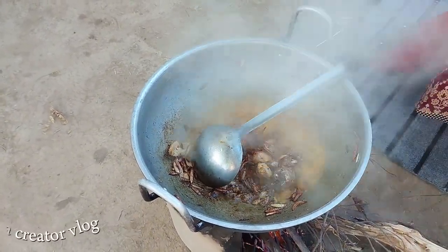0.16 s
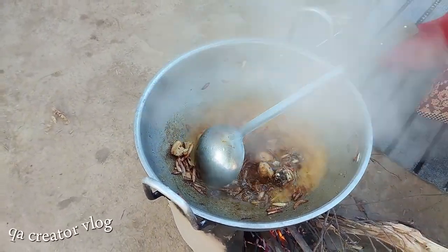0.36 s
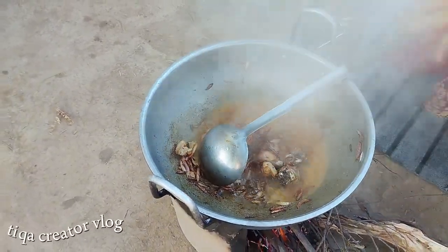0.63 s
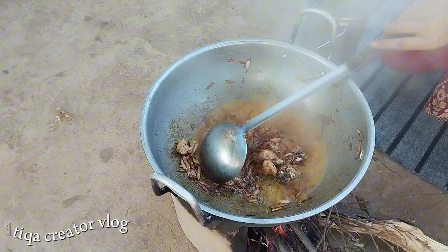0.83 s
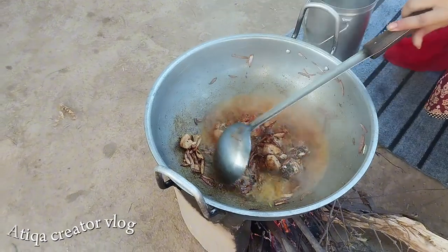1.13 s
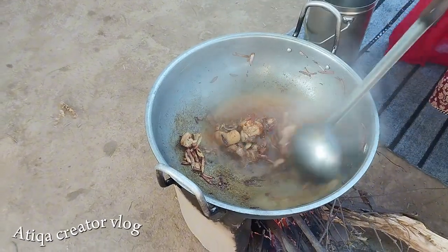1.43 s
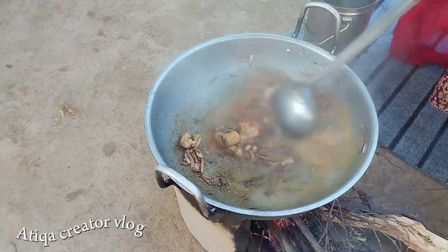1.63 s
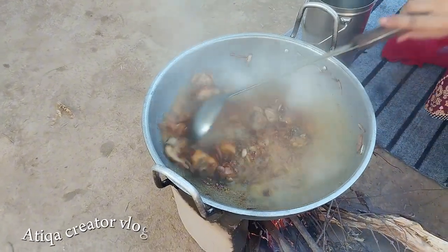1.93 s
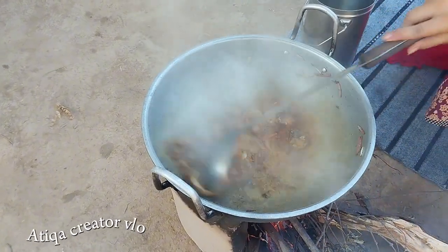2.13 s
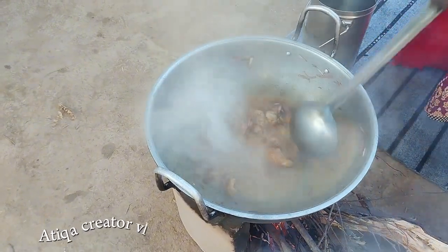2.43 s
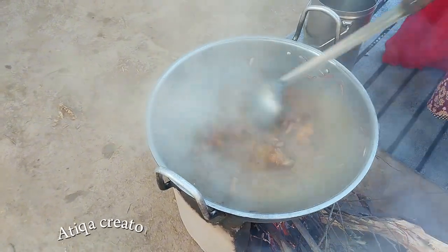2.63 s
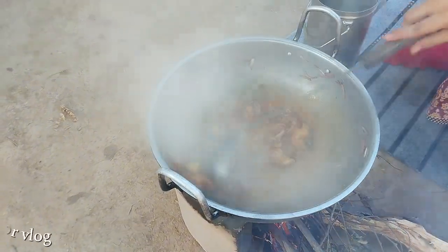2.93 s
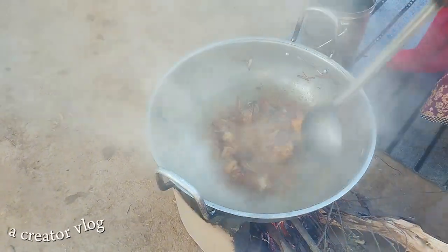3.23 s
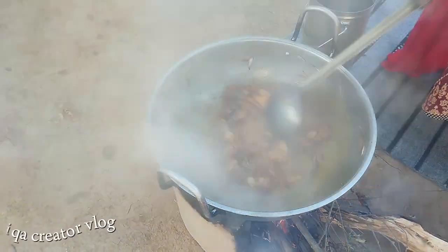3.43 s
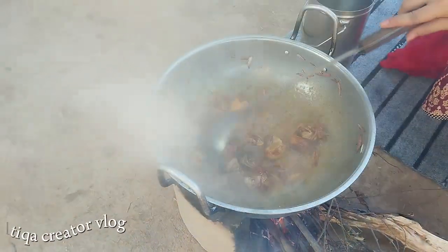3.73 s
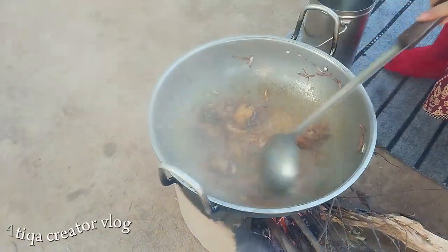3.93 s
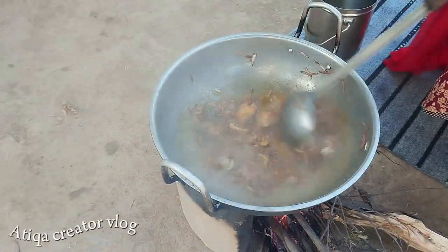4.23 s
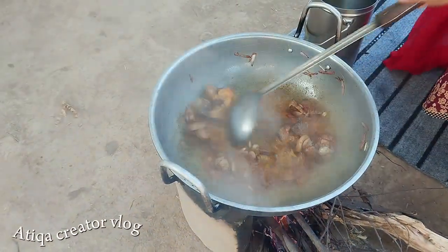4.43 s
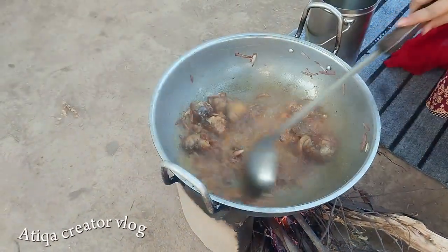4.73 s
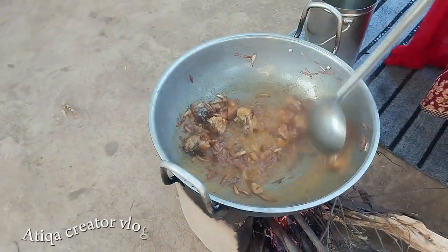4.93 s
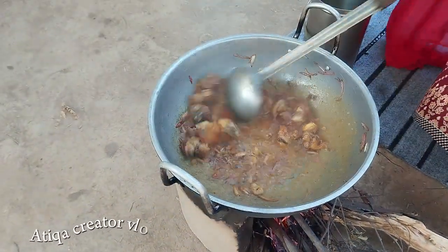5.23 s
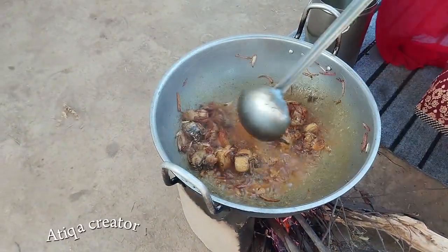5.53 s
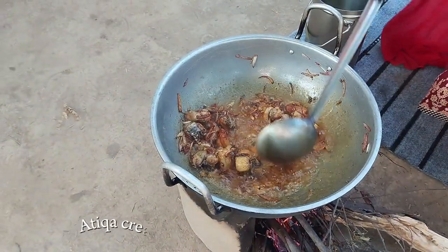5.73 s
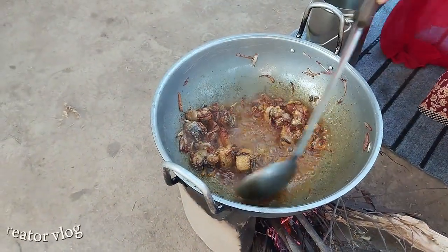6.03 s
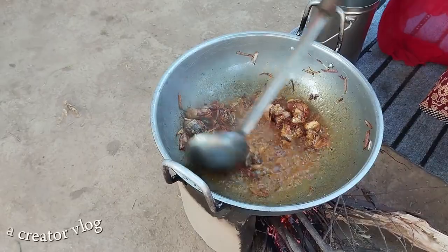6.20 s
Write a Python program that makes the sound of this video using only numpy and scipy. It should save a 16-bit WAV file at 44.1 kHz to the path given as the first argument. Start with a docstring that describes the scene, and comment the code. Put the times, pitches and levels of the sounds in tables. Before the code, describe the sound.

Loud, surging sizzling from a wide pan outdoors gradually thins, with ladle scrapes, dull knocks and wind rumble near the end.

```python
"""Sizzling pan over an outdoor fire

Water boils off in hot ghee in a wide metal pan over a wood fire, close to a phone.
Bursting bubbles hiss and spit, surge as a ladle turns the food, then thin as the water is used up.
The ladle scrapes, knocks and chatters, ringing the pan; late on, a breeze buffets the microphone."""
import sys
import numpy as np
from scipy import signal
from scipy.fft import rfft, irfft
from scipy.io import wavfile
from scipy.ndimage import uniform_filter1d

SR = 44100
rng = np.random.default_rng(int(sys.argv[2]) if len(sys.argv) > 2 else 0)


def to_wav(sig):
    """Store sig (one row per channel, or 1-D mono) as 16-bit WAV at the path in sys.argv[1].

    Samples outside -1..1 are clipped; the rate is SR.
    """
    pcm = np.clip(np.atleast_2d(sig), -1, 1) * 32767
    pcm = np.round(pcm).astype(np.int16)
    wavfile.write(sys.argv[1], SR, pcm.T)  # frames by channels


N = 280558
TIME = np.arange(N) / SR
HZ = np.fft.rfftfreq(N, 1 / SR)

# tone of the middle-sized bubbles and the spits: pitch_hz, level_db
HISS_TONE = [(900, -30.5), (2000, -10), (2600, -4), (3200, -1.5), (4200, -0.5), (5200, 0), (6800, 0),
             (8200, -4), (9500, -20), (12000, -14), (16000, -18)]


def amp(db):
    """Turns decibels into a gain to multiply by."""
    return 10 ** (np.asarray(db) / 20)


def evened(x):
    """Scales a signal to an average (rms) level of 1."""
    return x / np.sqrt(np.mean(x ** 2) + 1e-20)


def colour(x, tone):
    """Shapes a sound's lows and highs by rows of pitch_hz, level_db."""
    hz, db = np.transpose(tone)
    gain = amp(np.interp(np.log(HZ + 1), np.log(hz), db))
    return irfft(rfft(x) * gain, N)


def follow(rows):
    """A gain that glides through rows of time_s, level_db."""
    times, db = np.transpose(rows)
    return amp(np.interp(TIME, times, db))


def add(mix, start_s, sound):
    """Mixes a sound in at its start time."""
    part = mix[max(round(start_s * SR), 0):][:len(sound)]
    part += sound[:len(part)]


def wander(rate_hz):
    """A smooth random wobble, mostly slower than rate_hz."""
    return evened(irfft(rfft(rng.standard_normal(N)) / (1 + (HZ / rate_hz) ** 4), N))


def clicks(per_s, spread_db):
    """Random clicks of uneven size."""
    size = amp(spread_db * np.minimum(rng.exponential(1, N), 5))
    return evened(size * rng.choice([-1, 1], N) * (rng.random(N) < per_s / SR))


def clusters(x, depth_db=1.12):
    """Groups of like-sized bubbles come and go, each briefly lifting a narrow band of pitch."""
    bands = signal.stft(x, nperseg=1024, noverlap=768)[2]
    lift = uniform_filter1d(rng.standard_normal(bands.shape), size=16, axis=1)  # smooth in time
    lift = evened(uniform_filter1d(lift, size=5, axis=0))  # and in pitch
    return evened(signal.istft(bands * amp(depth_db * lift), nperseg=1024, noverlap=768)[1][:N])


def bubbles(per_s, spread_db, crackle, flutter_db, flutter_hz):
    """Bubbles burst in clumps over a wash of steam."""
    bursts = rng.standard_normal(N) + crackle * clicks(per_s, spread_db)
    return clusters(bursts) * amp(flutter_db * wander(flutter_hz))


def surges():
    """Water runs onto hot metal: boiling rises, holds while water arrives, then dies away."""
    # each surge: start_s, length_s, hiss_db, large_bubbles_db, rise_s, fall_s
    boil_offs = [(-.05, .62, -34.5, -41.5, 0.027, 0.092), (0.647, 0.19, -30.5, -37.5, 0.044, .008),
                 (0.93, 0.24, -28.5, -39, 0.053, 0.063), (1.157, 0.22, -31.5, -40, 0.022, 0.075),
                 (1.459, 0.081, -32, -36.5, 0.0061, 0.14), (1.604, 0.2, -30, -37.3, 0.049, 0.074),
                 (1.865, 0.13, -27, -37, 0.052, 0.06), (2.01, 0.2, -34.5, -63, 0.012, 0.12),
                 (2.436, 0.16, -30.5, -45, 0.021, 0.075), (2.595, 0.19, -31.5, -40.5, 0.035, 0.11),
                 (2.816, 0.267, -33.5, -51, 0.062, 0.021), (3.238, 0.19, -39, -61, .04, 0.018),
                 (3.533, 0.42, -34, -44.5, 0.065, 0.23), (4.373, 0.067, -38.5, -44.5, .05, 0.42),
                 (5.683, 0.074, -41, -64, 0.037, .02), (6.303, 0.094, -39, -52, .03, 0.034)]
    hiss_power, boil_power = np.zeros((2, N))
    for start_s, length_s, hiss_db, boil_db, rise_s, fall_s in boil_offs:
        age = np.maximum(TIME - start_s, 0)
        swell = (1 - np.exp(-age / rise_s)) * np.exp(-np.maximum(age - length_s, 0) / fall_s)
        hiss_power += (amp(hiss_db) * swell) ** 2
        boil_power += (amp(boil_db) * swell) ** 2
    return hiss_power, boil_power


def pan_air(x):
    """The air in the open pan boosts a few pitches."""
    # where that air rings: pitch_hz, width_hz, lift_db
    peaks = [(570, 330, 4.5), (1016, 164, 6.5), (1370, 340, 3), (1850, 146, 6), (2313, 110, 2.5),
             (2600, 95, 2.8), (3090, 116, 5), (3620, 360, 3), (4270, 190, 3)]
    lift_db = sum(db / (1 + (2 * (HZ - hz) / width) ** 2) for hz, width, db in peaks)
    return evened(irfft(rfft(x) * amp(lift_db), N))


def sizzle(boil_db=-41, boil_fall_db_per_s=1.15, fizz_follow=0.35):
    """Large bubbles boil, middling ones hiss, tiny ones fizz; all swell as water meets hot metal."""
    # tones of the large and the tiny bubbles: pitch_hz, level_db
    boil_tone = [(60, -9), (210, -13.5), (340, -11.5), (480, 0.5), (800, -3.5), (1300, 0.5), (2100, 0),
                 (3000, 3.5), (5000, -6), (9000, -30)]
    fizz_tone = [(3000, -18), (6000, -2), (8500, 2), (11000, -1.5), (12500, -4), (14500, 1), (15700, 2.5)]
    # steady hiss of the wet food, thinning as it dries: time_s, level_db
    simmer_levels = [(0, -34), (3.4, -34), (4.5, -33), (5.3, -36), (5.9, -40), (6.36, -41)]
    # finest spray, lasting until the pan is nearly dry: time_s, level_db
    spray_levels = [(0, -30), (1.35, -33), (2, -30.5), (3.3, -30), (5.5, -30), (6.36, -37.5)]
    boil = bubbles(per_s=900, spread_db=-0.5, crackle=0.56, flutter_db=0.8, flutter_hz=40)
    hiss = bubbles(per_s=2500, spread_db=2.0, crackle=0.63, flutter_db=0.26, flutter_hz=33)
    fizz = bubbles(per_s=3000, spread_db=3.5, crackle=0.44, flutter_db=0.88, flutter_hz=24)
    hiss_surge, boil_surge = surges()
    simmer = follow(simmer_levels)
    boil_gain = np.sqrt(amp(boil_db - boil_fall_db_per_s * TIME) ** 2 + boil_surge)
    hiss_gain = np.sqrt(simmer ** 2 + hiss_surge)
    fizz_gain = follow(spray_levels) * (hiss_gain / simmer) ** fizz_follow  # surges less than the hiss
    return (pan_air(colour(boil, boil_tone)) * boil_gain
            + pan_air(colour(hiss, HISS_TONE)) * hiss_gain
            + pan_air(colour(fizz, fizz_tone)) * fizz_gain)


def spits(fade_s=0.0035):
    """Pockets of water flash to steam in short, sudden puffs."""
    # each puff: start_s, level_db
    puffs = [(.823, -29), (.841, -34), (.945, -28.5), (1.143, -25), (1.473, -32), (2.548, -29),
             (3.552, -32), (3.622, -29.5), (4.853, -33), (5.371, -33)]
    swell = np.zeros(N)
    age = TIME[:SR // 10] / fade_s
    for start_s, db in puffs:
        add(swell, start_s, amp(db) * age * np.exp(1 - age))
    return swell * pan_air(colour(rng.standard_normal(N), HISS_TONE))


def pan_ring(force):
    """The metal rings briefly when touched, muffled by the food."""
    # notes of the full pan: pitch_hz, level_db, ring_s (time to fade by 60 dB)
    notes = [(298, -8, 0.28), (351, -2.5, 0.041), (434, 3.5, 0.028), (503, -4, 0.073), (544, -4, 0.051),
             (679, -7, 0.08), (698, -14, 0.11), (820, -20, 0.035), (1005, -16.5, 0.21), (1037, -18, 0.066),
             (1480, -12, 0.11)]
    t = TIME[:SR // 3]
    ring = sum(amp(db - 60 * t / ring_s) * np.sin(2 * np.pi * hz * t) for hz, db, ring_s in notes)
    return signal.oaconvolve(force, ring / np.abs(rfft(ring)).max())[:N]


def scrapes(fade_share=0.25):
    """The dragged ladle catches on grit and spice; each catch rings the pan."""
    # pushes, dull on food and brighter on bare metal: start_s, length_s, level_db, top_hz
    pushes = [(1.283, .22, -48, 600), (1.682, 0.327, -51, 648), (3.838, 0.065, -47, 700),
              (4.285, 0.4, -41.5, 700), (4.897, 0.091, -39, 1300), (5.054, .15, -47.5, 1300),
              (5.17, 0.305, -37.5, 1500), (5.223, 0.03, -30, 900), (5.27, 0.042, -32, 1500)]
    catches = clicks(per_s=970, spread_db=2.0)
    force = np.zeros(N)
    for start_s, length_s, db, top_hz in pushes:
        pressure = np.zeros(N)
        add(pressure, start_s, amp(db) * signal.windows.tukey(int(length_s * SR), fade_share))
        force += pressure * signal.sosfilt(signal.butter(2, top_hz, fs=SR, output="sos"), catches)
    return pan_ring(force) / pan_ring(catches).std()


def knocks(tick_hz=1350, tick_s=0.0018):
    """Each blow of the ladle makes a dull thud and a metal tick, and rings the pan."""
    # each thud: start_s, level_db, pitch_hz, ring_s, tick_db (compared with the thud)
    hits = [(3.883, -28.5, 332, 0.035, -25), (4.341, -20.5, 490, 0.031, -30), (4.345, -27.5, 290, 0.1, -30),
            (4.497, -31.5, 285, 0.077, -25), (4.602, -33, 494, 0.013, -17), (4.801, -24.5, 450, 0.0075, -8),
            (4.812, -23.5, 483, 0.011, -20), (4.963, -22.5, 480, 0.013, -12),
            (5.0551, -19.5, 520, 0.019, 8.5), (5.228, -27, 296, 0.055, -25),
            (5.239, -23.5, 315, 0.055, -25), (5.288, -25, 470, 0.011, -22),
            (5.2991, -12.5, 530, 0.037, 3.5), (5.337, -22, 446, 0.016, -20), (5.389, -19, 450, 0.011, -11),
            (5.4327, -20, 503, 0.017, -10), (6.307, -25, 370, 0.032, 0)]
    blows, t = np.zeros(N), TIME[:SR // 8]
    tick = amp(-60 * t / tick_s) * np.sin(2 * np.pi * tick_hz * t)
    for start_s, db, hz, ring_s, tick_db in hits:
        thud = amp(-60 * t / ring_s) * np.sin(2 * np.pi * hz * t)
        add(blows, start_s, amp(db) * (thud - amp(tick_db) * tick))
    return blows + amp(-4) * pan_ring(blows)


def chatter():
    """The ladle's rim sticks and slips on the metal in brief, uneven squeaks."""
    # each squeak: start_s, length_s, start_hz, end_hz, level_db
    squeaks = [(4.964, 0.017, 686, 505, -27), (5.239, 0.0198, 633, 1190, -25.5),
               (5.276, 0.018, 1054, 950, -20), (5.358, 0.017, 976, 980, -31.5),
               (5.425, 0.014, 1020, 990, -32.5)]
    slips = np.zeros(N)
    waver = 1 + .04 * wander(rate_hz=300)
    for start_s, length_s, start_hz, end_hz, db in squeaks:
        count = int(length_s * SR)
        hz = np.linspace(start_hz, end_hz, count) * waver[int(start_s * SR):][:count]
        tone = np.sin(2 * np.pi * np.cumsum(hz) / SR)
        add(slips, start_s, amp(db) * signal.windows.tukey(count, .7) * tone)
    return slips + amp(14.5) * pan_ring(slips)


def ladle(low_hz=220, top_hz=2100):
    """All ladle sounds; the pan gives out little below its lowest note, and food dulls the highs."""
    band_pass = signal.butter(3, [low_hz, top_hz], "bandpass", fs=SR, output="sos")
    return signal.sosfilt(band_pass, knocks() + chatter() + scrapes())


def wind(gust_db=1, gust_hz=8):
    """Gusty air rumbles on the microphone; single swirls hit it as soft thumps."""
    # tone of the breeze: pitch_hz, level_db
    breeze_tone = [(8, -15), (22, 6), (42, -4), (80, -10.5), (140, -15.5), (200, -23.5), (320, -30.5),
                   (800, -34.5), (3000, -90)]
    # the breeze, calm at first and then rising: time_s, level_db
    breeze_levels = [(0, -57.5), (1.4, -53.5), (3.5, -57), (4.6, -40.5), (4.8, -32), (5.45, -34),
                     (6.36, -35.5)]
    # the strongest swirls: peak_time_s, level_db, pitch_hz
    swirls = [(4.159, -34, 54.7), (4.715, -26, 105), (4.81, -25.5, 121), (4.83, -25.5, 82),
              (4.933, -21, 60.3), (4.954, -22, 131), (5.076, -24, 84), (5.544, -25.5, 75),
              (5.703, -31, 123), (5.732, -20, 65), (5.926, -25, 35.2), (6.173, -23, 104)]
    rumble = evened(colour(rng.standard_normal(N), breeze_tone))
    rumble *= follow(breeze_levels) * amp(gust_db * wander(gust_hz))
    t = TIME[:SR // 5] - .1  # centred on the thump's peak
    for peak_s, db, hz in swirls:
        spread = (np.pi * hz * t) ** 2
        add(rumble, peak_s + t[0], amp(db) * (1 - 2 * spread) * np.exp(-spread))
    return rumble


def scene():
    """All sounds in open air, with no echo; left and right are alike."""
    mono = sizzle() + spits() + ladle() + wind()
    return np.array([mono, mono])


def record(dry, top_hz=15760):
    """The phone cuts two dips in the treble and drops the very highest pitches."""
    # the dips: pitch_hz, half_width_hz
    dips = [(9890, 723), (13400, 1260)]
    gain = np.prod([(HZ - hz) ** 2 / ((HZ - hz) ** 2 + width ** 2) for hz, width in dips], axis=0)
    dipped = irfft(rfft(dry) * gain, N)
    low_pass = signal.firwin(1023, top_hz, window=("kaiser", 9), fs=SR)
    return signal.oaconvolve(dipped, low_pass[None], "same")


dry = scene()
out = record(dry)
to_wav(out)
```